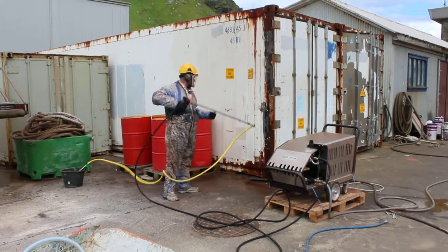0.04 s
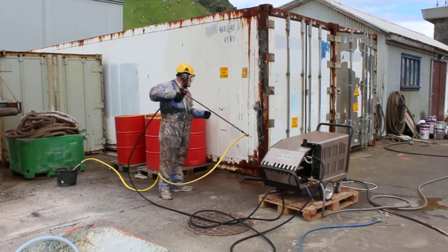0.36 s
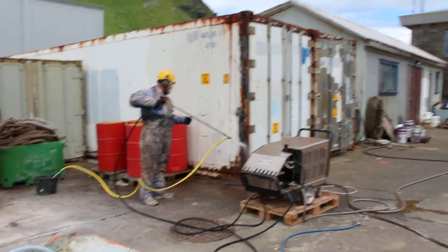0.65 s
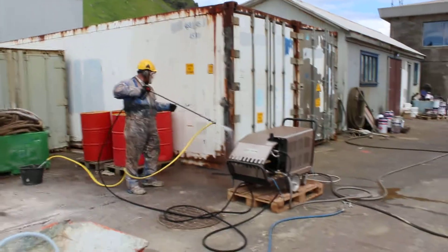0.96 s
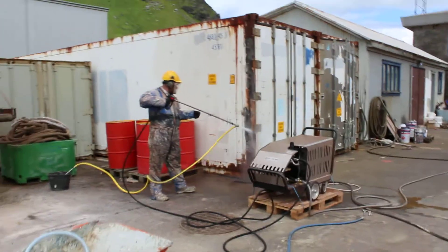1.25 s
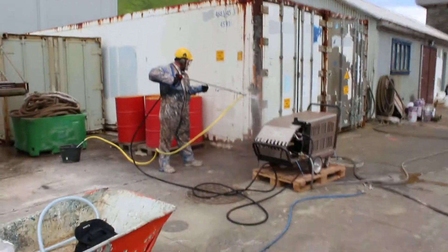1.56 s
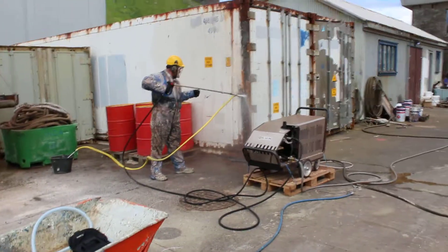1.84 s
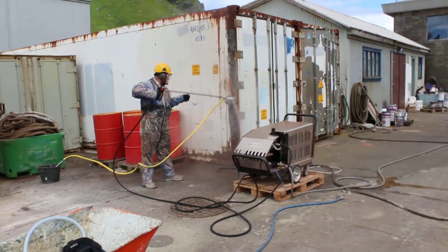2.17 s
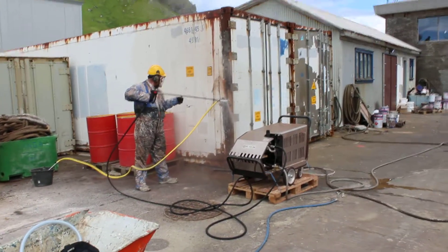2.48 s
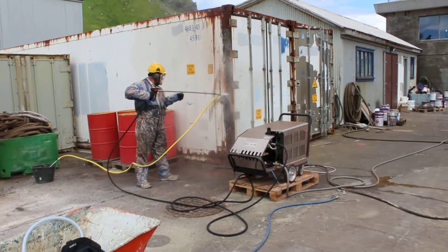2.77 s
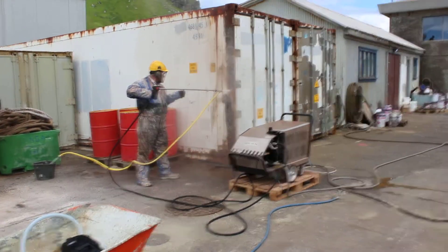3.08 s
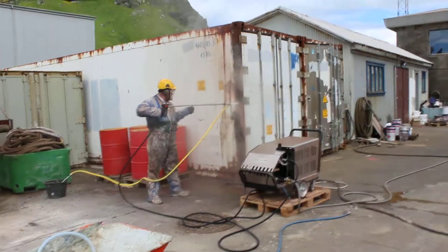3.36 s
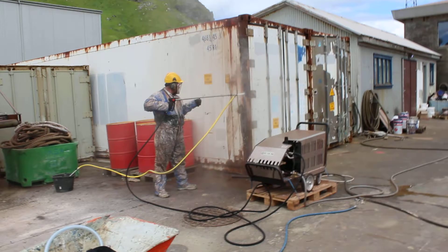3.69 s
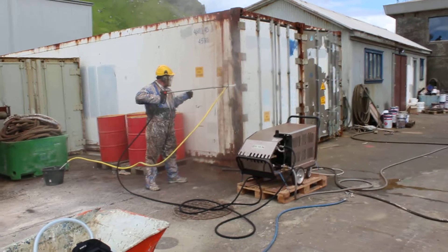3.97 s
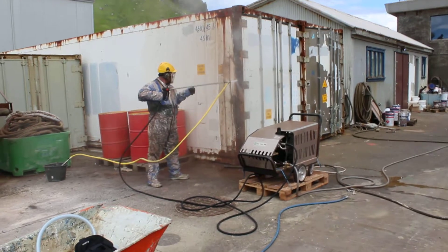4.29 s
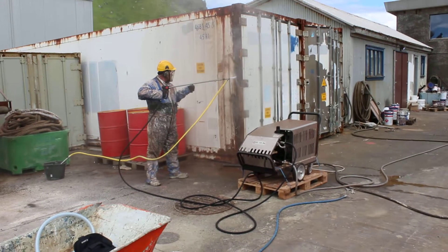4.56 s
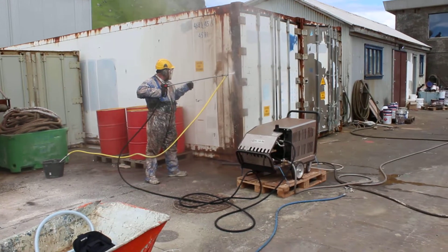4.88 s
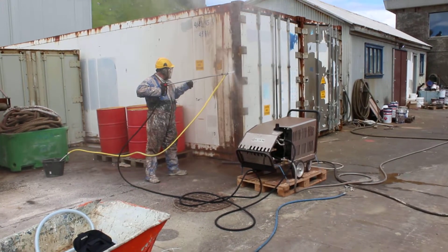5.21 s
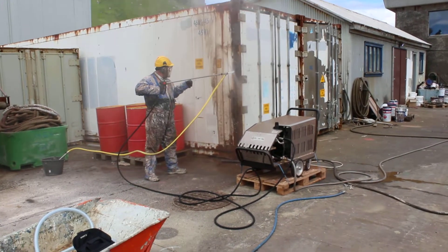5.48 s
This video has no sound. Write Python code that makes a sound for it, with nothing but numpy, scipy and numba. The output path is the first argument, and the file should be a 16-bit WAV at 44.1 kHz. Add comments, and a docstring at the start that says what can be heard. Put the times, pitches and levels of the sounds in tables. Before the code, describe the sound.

A pressure washer's pump hums with a fast, light rattle, until a sudden blast of water and sand takes over. The jet hits a steel container wall with a brief thump, then hisses and spatters steadily, its tone shifting as it travels over the metal and softening a little later on. The pump stays faint underneath. The setting is an open yard with hardly any echo and slight wind on the microphone.

```python
"""A yard with a steel container, where a pressure washer's piston pump drones in a light wind.
The trigger is pulled and a jet of water and sand bursts out. Its turbulence hisses, and its impact
drives the steel into vibration as it moves from a low panel over the corner post to a higher panel.
Automatic gain control ducks under the blast, so the loaded pump sinks to a faint hum."""
import sys
import numpy as np
from scipy import signal
from scipy.fft import rfft, irfft, next_fast_len
from scipy.io import wavfile
from scipy.ndimage import uniform_filter1d, map_coordinates
from numba import njit

SR = 44100
rng = np.random.default_rng(int(sys.argv[2]) if len(sys.argv) > 2 else 0)


def wav_record(signal):
    """Record a signal, one row per channel, as 16-bit PCM in the file named by sys.argv[1]."""
    frames = np.transpose(np.atleast_2d(signal))
    bounded = np.clip(frames, -1, 1)
    # unit amplitude maps onto the largest positive 16-bit level
    quanta = np.round(bounded * 32767).astype(np.int16)
    wavfile.write(sys.argv[1], SR, quanta)


N = 248724
TIME = np.arange(N) / SR


def amp(db):
    """Amplitude ratio of a level in decibels."""
    return 10 ** (np.asarray(db) / 20)


def unit(x):
    """Normalisation to rms 1."""
    return x / np.sqrt(np.mean(x ** 2) + 1e-20)


def spectrum_gain(points, hz):
    """Log-frequency interpolation of (frequency [Hz], level [dB]), falling 60 dB an octave outside."""
    f, db = np.transpose(points)
    octaves_outside = np.abs(np.log2((hz + 1) / np.clip(hz + 1, f[0], f[-1])))
    return amp(np.interp(np.log(hz + 1), np.log(f), db) - 60 * octaves_outside)


def resonance(hz, centre, width):
    """Lorentzian curve of height 1."""
    return 1 / (1 + ((hz - centre) / (width / 2)) ** 2)


def curves(rows):
    """Linear interpolation in time of each column after the first."""
    times, *columns = np.transpose(rows)
    return [np.interp(TIME, times, column) for column in columns]


def wobble(rate):
    """Smooth random modulation: a spline through `rate` knots a second."""
    return map_coordinates(rng.standard_normal(int(N * rate / SR) + 4), [TIME * rate])


def filtered(x, response):
    """Filtering as multiplication of the spectrum by a frequency response."""
    size = next_fast_len(N + SR // 2)
    return irfft(rfft(x, size) * response(np.fft.rfftfreq(size, 1 / SR)), size)[:N]


def noise(spectrum, patchy_db=0):
    """Spectrally shaped noise of rms 1, with optional drifting patches of gain."""
    white = signal.stft(rng.standard_normal(N), nperseg=512)[2]
    patches = uniform_filter1d(rng.standard_normal(white.shape), size=5, axis=0)
    patches = uniform_filter1d(patches, size=18, axis=1)
    patchy = signal.istft(white * amp(patchy_db * unit(patches)), nperseg=512)[1]
    return unit(filtered(patchy, lambda hz: spectrum_gain(spectrum, hz)))


def blend(sounds, position):
    """Equal-power crossfade along a row of sounds."""
    return sum(x * np.sqrt(np.clip(1 - np.abs(position - k), 0, 1)) for k, x in enumerate(sounds))


def harmonics(angle, orders, gains):
    """Fourier series in the shaft angle, with random phases and rms 1."""
    turn = np.linspace(0, 2 * np.pi, 4096)
    cycle = sum(g * np.sin(round(k) * turn + rng.uniform(0, 2 * np.pi)) for k, g in zip(orders, gains))
    return unit(np.interp(angle % (2 * np.pi), turn, cycle))


def locked_lines(angle, table, shaft_hz):
    """Phase locking: each (frequency [Hz], level [dB]) line takes the nearest shaft harmonic."""
    hz, db = np.transpose(table)
    return np.linalg.norm(amp(db)) * harmonics(angle, hz / shaft_hz, amp(db))


# Wind spectrum: (frequency [Hz], relative density [dB])
WIND_SPECTRUM = [(25, -14), (42, -4), (62, -11), (100, 4), (125, 0), (160, -1.5), (200, -5)]
# Puffs of wind: (time [s], half length [s], relative level [dB])
WIND_PUFFS = [(1.05, 0.055, -55), (2.89, 0.047, -49), (4.63, .06, -47), (4.738, .05, -49),
              (4.81, .035, -46), (5.49, 0.02, -51)]


def wind(breeze_db=-39, flutter_db=2.5, flutter_hz=9, puff_gain_db=18):
    """Turbulent pressure on the microphone: a fluttering breeze with a few soft, low puffs."""
    breeze = amp(breeze_db + flutter_db * wobble(flutter_hz))
    puffs = sum(amp(db) * np.exp(-((TIME - s) / half_s) ** 2) for s, half_s, db in WIND_PUFFS)
    return (breeze + amp(puff_gain_db) * puffs) * noise(WIND_SPECTRUM)


# Hum of the pump running free: (shaft order, relative level [dB])
FREE_ORDERS = [(1, -27), (2, -20.5), (3, -49.5), (4, -17.5), (5, -36), (6, -13), (7, -17), (8, -13),
               (9, 0.5), (10, -11), (11, -11), (12, -16), (13, -2), (14, -1), (15, -15), (16, -14),
               (17, -19), (18, -6), (19, -39), (20, -10.5), (21, -20), (22, -7), (23, -29), (24, -18),
               (25, -9.5), (26, -7), (27, -16.5), (28, -28), (29, -13.5), (30, -13.5), (31, -22), (32, -5),
               (33, -11), (34, -28), (35, -5), (36, -21), (37, -20), (38, -8.5), (39, -14), (40, -12.5)]
# Buzz of its housing: (frequency [Hz], relative level [dB])
HOUSING_LINES = [(1077, -30.5), (1227, -31.5), (1249, -35), (1351, -39), (1427, -41), (1502, -35.5),
                 (1577, -34.5), (1604, -31), (1674, -32.5), (1750, -30.5), (1776, -33), (1803, -37),
                 (1927, -34), (2003, -36), (2250, -45), (2428, -33)]
# Hum under pressure: (frequency [Hz], relative level [dB])
LOADED_LINES = [(123.8, -61.5), (199.2, -63), (220.7, -51.5), (247.6, -56.5), (296.1, -47.5),
                (323.0, -62.5), (344.5, -55), (371.4, -49.5), (398.4, -50.5), (522.2, -50.5), (818.3, -55),
                (845.2, -53.5), (1017, -60), (1066, -49.5), (1637, -46)]


def piston_hum(angle, shaft_hz, load, free_db=-15.5, buzz_gain_db=-3, loaded_gain_db=15.5):
    """Periodic forcing gives shaft harmonics; under load, free hum and buzz yield to the loaded hum."""
    orders, db = np.transpose(FREE_ORDERS)
    free = amp(free_db) * harmonics(angle, orders, amp(db))
    buzz = amp(buzz_gain_db) * locked_lines(angle, HOUSING_LINES, shaft_hz[0])
    loaded = amp(loaded_gain_db) * locked_lines(angle, LOADED_LINES, shaft_hz[-1])
    return (1 - load) * (free + buzz) + load * loaded


# Envelope of the valve clatter: (frequency [Hz], relative density [dB])
VALVE_SPECTRUM = [(590, -32), (1000, -13.5), (1210, -23), (1430, -36.5), (1740, -14), (2090, 2),
                  (2410, 0.5), (3190, 0), (3460, -25), (4000, 0), (5200, -49), (8800, -120)]


def valve_clatter(angle, shaft_hz, scatter_db=2.1):
    """Impacts that repeat with every turn form a dense series of high harmonics."""
    orders = np.arange(41, 160)
    scatter = amp(scatter_db * rng.standard_normal(len(orders)))
    return harmonics(angle, orders, spectrum_gain(VALVE_SPECTRUM, orders * shaft_hz) * scatter)


# Running state of the pump: (time [s], shaft rate [Hz], load [0-1])
PUMP_STATE = [(0, 25.02, 0), (.59, 25.02, 0), (.68, 24.77, 1), (5.64, 24.77, 1)]
# Rush of its fan: (frequency [Hz], relative density [dB])
FAN_SPECTRUM = [(30, -12), (120, -21), (300, -6), (800, -6), (1300, 1), (1750, -2.5), (2100, -4),
                (3100, -4.5), (4500, -9.5), (6000, -17), (6600, -10.5), (8000, -12.5), (10000, -24.5),
                (15000, -46)]


def pump(clatter_db=-29, fan_db=-25, throb_db=1.5, stroke_db=-0.1):
    """Rotating machine: three pistons hum; each turn and stroke modulates the valve and fan noise."""
    shaft_hz, load = curves(PUMP_STATE)
    angle = 2 * np.pi * np.cumsum(shaft_hz) / SR + .003 * wobble(40)  # slightly uneven rotation
    hum = piston_hum(angle, shaft_hz, load)
    clatter = amp(clatter_db) * valve_clatter(angle, shaft_hz[0])
    fan = amp(fan_db) * noise(FAN_SPECTRUM)
    throb = unit(amp(throb_db * np.cos(angle) + stroke_db * np.cos(3 * angle)))
    return hum + throb * (clatter + fan)


def reflections(x, echo_db=-22, count=8):
    """Comb filtering: weak early echoes from ground and containers ripple the spectrum."""
    delays_s = rng.uniform(.003, .03, count)
    echoes = sum(np.pad(x, (round(s * SR), 0))[:N] for s in delays_s)
    return (x + amp(echo_db) * echoes) / np.sqrt(1 + count * amp(echo_db) ** 2)


# Path of the jet: (time [s], place [0 low panel, 1 corner post, 2 high panel])
AIM_PATH = [(1.25, 0.071), (2.15, 0.85), (3.13, 1.27), (3.27, 1.84)]
# Balance at each of these places: (drumming gain [dB], spatter gain [dB], hiss gain [dB])
PLACE_GAINS = [(-5, -1.5, -1.5), (-11, -6.5, 0.5), (-11.5, -6, 0)]


def aim():
    """The point of excitation sets the balance: returns the place and its three gains over time."""
    place, = curves(AIM_PATH)
    return place, [np.interp(place, np.arange(len(db)), db) for db in np.transpose(PLACE_GAINS)]


# Boom of the container wall: (frequency [Hz], relative density [dB])
BOOM_SPECTRUM = [(80, -30), (140, -11), (215, 6.5), (270, 0), (350, -1), (450, -3.5), (600, -30)]


def boom(place, peak_s=0.733, attack_s=0.035, decay_s=0.078):
    """Forced vibration: the wall booms as the jet lands and rumbles less off the loose low panel."""
    t = TIME - peak_s
    thump = amp(-25) * np.exp(-np.maximum(-t / attack_s, t / decay_s))
    rumble = amp(-37.5 - 20 * np.minimum(place, 1))
    return (thump + rumble) * noise(BOOM_SPECTRUM)


def grit(grains_per_s=110, gain_db=-14, spread_db=2.0):
    """Poisson process: coarse grains tick on the steel at independent instants."""
    hits = rng.random(N) < grains_per_s / SR
    sizes = amp(spread_db * np.minimum(rng.standard_exponential(N), 3)) * rng.choice([-1, 1], N)
    spectrum = [(1200, 5), (3000, -4), (7500, 13), (10000, -12), (15000, -23)]
    return amp(gain_db) * filtered(hits * sizes, lambda hz: spectrum_gain(spectrum, hz))


def crack(start_s=.597, gain_db=0.5, decay_s=0.0074):
    """Broadband transient: the first slug of water bursts out of the nozzle."""
    t = TIME - start_s
    spectrum = [(500, -12), (1300, 4), (3000, 4), (5000, -9), (8000, -4.0), (15000, -34)]
    return amp(gain_db) * (t > 0) * np.exp(-np.abs(t) / decay_s) * noise(spectrum)


# Slugs of wet sand: (time [s], relative peak level [dB])
SAND_SLUGS = [(0.8897, 5.5), (1.1674, 1), (2.5865, -6), (2.7055, 0), (2.8564, -2), (3.729, 3), (4.0801, -5)]


def spits(gain_db=-17.0, half_s=0.0025):
    """Pulsed flow: each slug leaves the nozzle as a Gaussian burst of bright hiss."""
    bursts = sum(amp(db) * np.exp(-((TIME - s - half_s / 2) / half_s) ** 2) for s, db in SAND_SLUGS)
    return amp(gain_db) * bursts * noise(BRIGHT_SPECTRUM)


# Nozzle hiss, bright and dull: (frequency [Hz], relative density [dB])
BRIGHT_SPECTRUM = [(2350, -14), (4000, -7.5), (4330, -9), (5070, -5), (6040, -10.5), (6900, 0), (7800, 0),
                   (11900, -20), (14600, -31.5), (15400, -38)]
DULL_SPECTRUM = [(2350, -19), (4000, -11.5), (6610, -1), (9480, -12.5), (11900, -32.5), (13500, -35),
                 (15400, -49)]
# Passage from bright to dull: (time [s], dullness [0-1])
HISS_DULLNESS = [(3.1, 0.14), (3.3, 0.31), (3.74, 0.53), (3.79, 0.88)]


def hiss(gain_db=2.13, patchy_db=0.6):
    """Turbulence at the nozzle radiates broadband noise, duller as the lance is raised."""
    colours = [noise(BRIGHT_SPECTRUM, patchy_db), noise(DULL_SPECTRUM, patchy_db)]
    return amp(gain_db) * blend(colours, curves(HISS_DULLNESS)[0])


# Response of the steel at each place: (frequency [Hz], relative density [dB])
LOW_PANEL_SPECTRUM = [(240, -34), (400, -8), (425, -24.5), (511, -3.5), (695, -4.5), (826, 0.5), (1180, -7),
                      (1540, -3), (1660, -2.5), (2340, -2), (2620, -1), (3420, -1), (3830, -1.5),
                      (4240, -12), (4600, -11), (5980, -29), (10100, -120)]
POST_SPECTRUM = [(240, -71), (400, -27), (421, -24), (527, -7), (702, -11.5), (826, -10.5), (1010, -9.5),
                 (1270, -7.5), (1420, -9.5), (1800, -4), (2620, -8), (2930, -2.5), (3350, -7), (3640, -5),
                 (4600, -19), (5980, -27), (10100, -120)]
HIGH_PANEL_SPECTRUM = [(240, -58), (400, -19), (439, -33), (511, -15), (549, -16), (634, -13), (769, -33),
                       (818, -13.5), (1030, -2.5), (1240, -14), (1530, -1), (2200, -3), (3320, -2),
                       (3990, -6), (4600, -2.5), (5980, -18), (10100, -120)]
# Resonances of the high panel: (frequency [Hz], width [Hz], gain [dB])
HIGH_PANEL_MODES = [(537, 70, 0.5), (1130, 240, -1.5), (1426, 300, 1)]


def impact(place, drum_db, spatter_db, split_hz=1900):
    """Random excitation of steel: sand and water drum below the split frequency and spatter above."""
    modes = lambda hz: amp(sum(db * resonance(hz, f, width) for f, width, db in HIGH_PANEL_MODES))
    high_panel = unit(filtered(noise(HIGH_PANEL_SPECTRUM, patchy_db=0.13), modes))
    low_panel = noise(LOW_PANEL_SPECTRUM, patchy_db=1.0)
    post = noise(POST_SPECTRUM, patchy_db=0.9)
    steel = blend([low_panel, post, high_panel], place)
    drum = filtered(steel, lambda hz: 1 / (1 + (hz / split_hz) ** 12))
    levelled = lambda x: x / np.sqrt(np.abs(uniform_filter1d(x * x, size=SR // 5)))
    return amp(drum_db) * levelled(drum) + amp(spatter_db) * levelled(steel - drum)


# Bands that swell or sink for a while, the first a hollow as the jet opens, the rest at the spots struck:
# (start [s], end [s], frequency [Hz], width [Hz], gain [dB])
PASSING_BANDS = [(0.652, .8, 5400, 1590, -4.5), (.95, 1.45, 820, 110, 3.5), (0.901, 1.5, 2690, 110, 1.5),
                 (1.85, 2.72, 3670, 110, 5), (3.25, 4.6, 1510, 220, 3), (3.27, 3.676, 2720, 950, -7.5),
                 (3.3, 3.845, 5670, 700, 1), (3.88, 4.597, 6498, 150, 1.5), (4.4, 5.5, 5500, 130, 3.5)]


def passing_resonances(x, fade_s=0.13, waver_db=.5, waver_hz=6):
    """Local response: a band swells or sinks for a while, wavering with the hand; most follow the spot where
    the jet dwells, the first hollows the jet's opening."""
    out = x
    for start, end, centre, width, db in PASSING_BANDS:
        dwell = np.clip(np.minimum(TIME - start, end - TIME) / fade_s + .5, 0, 1)
        band = filtered(x, lambda hz: resonance(hz, centre, width))
        out = out + (amp(db + waver_db * wobble(waver_hz)) - 1) * dwell * band
    return out


# Nozzle pressure as the trigger is pulled, acting on the whole jet: (time [s], gain [dB])
NOZZLE_PRESSURE = [(.574, -63), (.581, 2), (.594, 1), (.6, 11), (.622, 19), (.68, 12), (.78, 12)]
# Flow of sand and water: (time [s], relative level [dB])
JET_FLOW = [(0.7, -20.5), (0.81, -17.5), (1.03, -18), (1.86, -17), (2.02, -17), (2.38, -18.5), (2.66, -17),
            (2.76, -19), (2.95, -17), (3.72, -16.5), (3.87, -18), (5.19, -17), (5.6, -17.5)]


def jet(swell_db=0.33, surge_db=.45, sputter_db=0.49, grain_db=-0.45, landing_s=0.61, rise_s=0.072):
    """Common amplitude modulation: an uneven sand feed makes hiss and impact sputter together."""
    place, (drum_db, spatter_db, hiss_db) = aim()
    slow_db = swell_db * wobble(11) + surge_db * wobble(35)
    fast_db = sputter_db * wobble(220) + grain_db * wobble(1800)
    feed = amp(curves(JET_FLOW)[0]) * unit(amp(slow_db + fast_db))
    landed = np.clip((TIME - landing_s) / rise_s, 0, 1)  # the impact builds just after the hiss
    strike = amp(-3.5 * (1 - landed)) * impact(place, drum_db, spatter_db)
    stream = passing_resonances(feed * (strike + amp(hiss_db) * hiss()))
    return amp(curves(NOZZLE_PRESSURE)[0]) * (stream + boom(place) + spits() + grit())


def scene():
    """Superposition of pump, jet and wind, alike in both channels."""
    yard = pump() + reflections(jet() + crack()) + wind()
    return np.array([yard, yard])


@njit
def follow(level, attack, release):
    """Envelope follower: a first-order lag with separate rates of rise and fall."""
    out, held = np.empty(len(level)), 0.0
    for i in range(len(level)):
        held += (level[i] - held) * (attack if level[i] > held else release)
        out[i] = held
    return out


def gain_control(x, threshold_db=-15.5, attack_s=0.027, release_s=1.7, bass_hz=400):
    """Limiting: the gain falls by as much as the level above the bass exceeds the threshold."""
    sensed = filtered(x[0], lambda hz: hz > bass_hz)
    rms = np.sqrt(np.abs(uniform_filter1d(sensed ** 2, size=256)))
    held = follow(rms, 1 / (attack_s * SR), 1 / (release_s * SR))
    return x / np.maximum(1, held / amp(threshold_db))


def record(dry, top_hz=15500):
    """Finite range and bandwidth: gain control, clipping of the first blast, then a low-pass."""
    clipped = np.clip(gain_control(dry), -1, 1)
    return np.array([filtered(channel, lambda hz: hz < top_hz) for channel in clipped])


dry = scene()
out = record(dry)
wav_record(out)
```